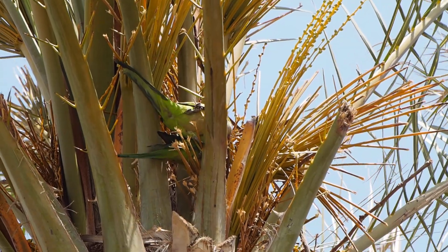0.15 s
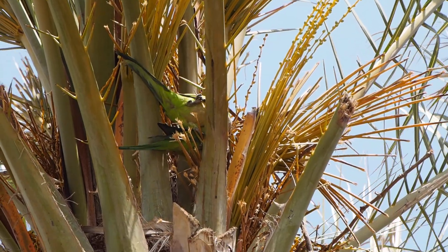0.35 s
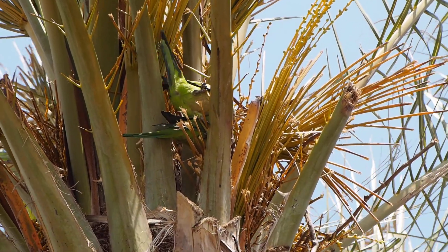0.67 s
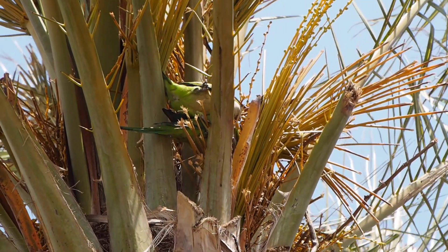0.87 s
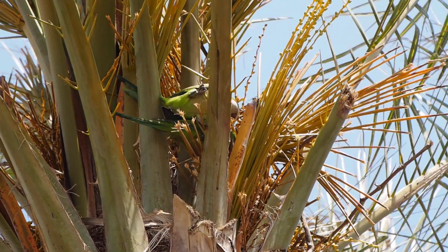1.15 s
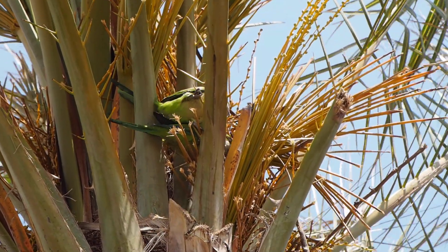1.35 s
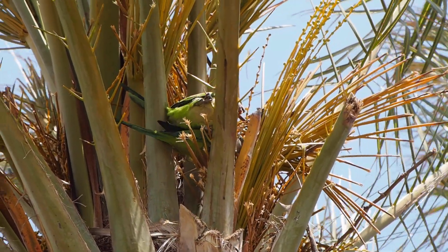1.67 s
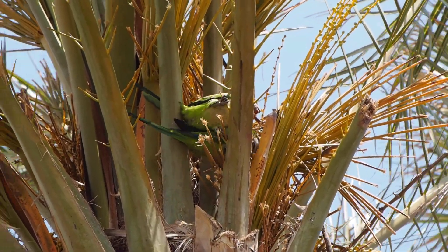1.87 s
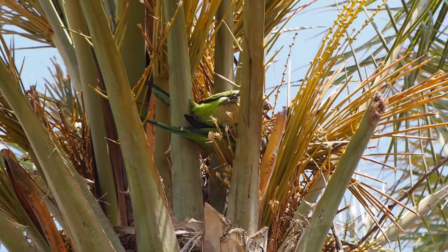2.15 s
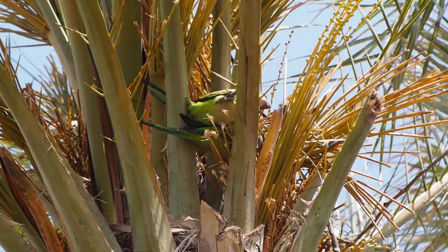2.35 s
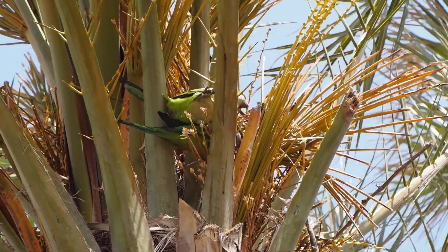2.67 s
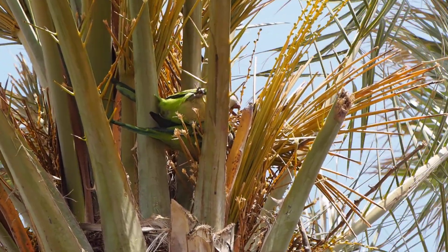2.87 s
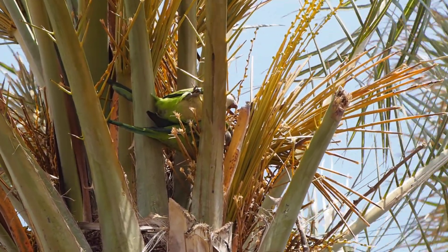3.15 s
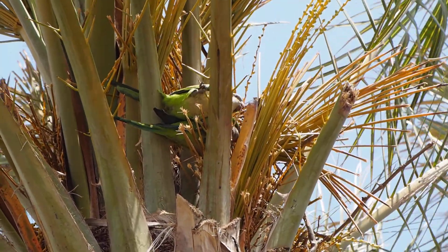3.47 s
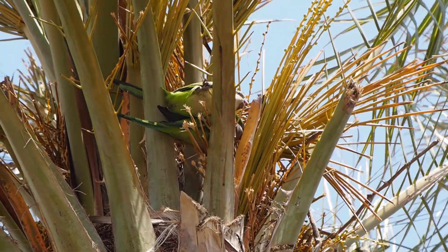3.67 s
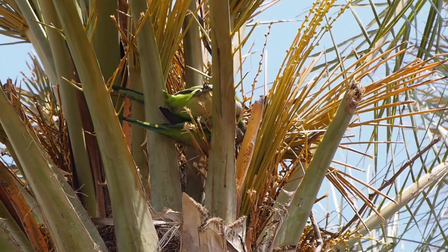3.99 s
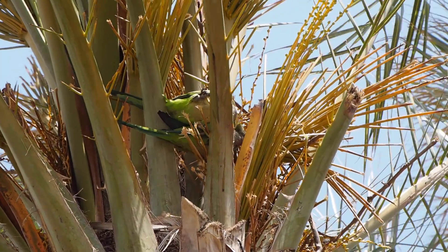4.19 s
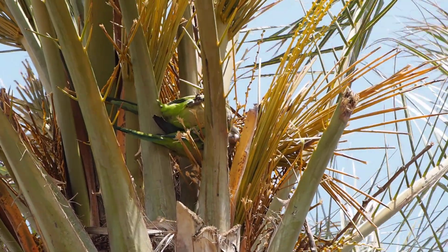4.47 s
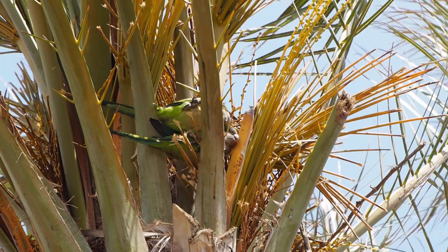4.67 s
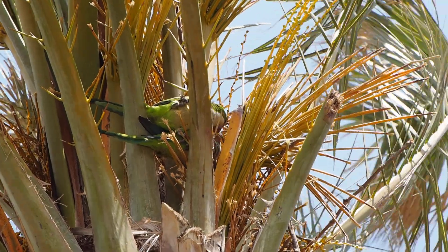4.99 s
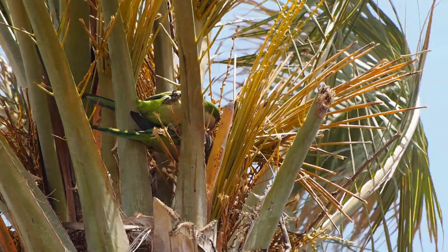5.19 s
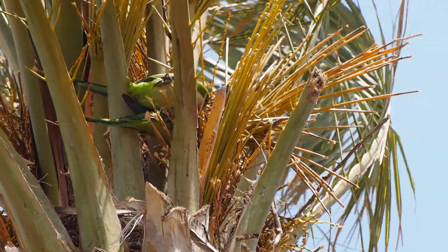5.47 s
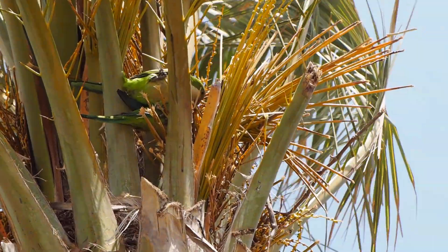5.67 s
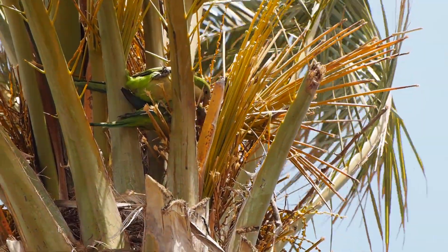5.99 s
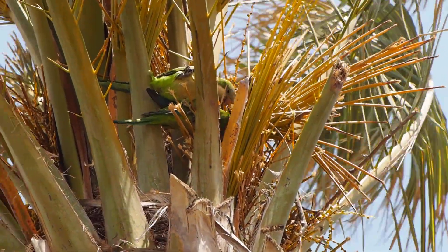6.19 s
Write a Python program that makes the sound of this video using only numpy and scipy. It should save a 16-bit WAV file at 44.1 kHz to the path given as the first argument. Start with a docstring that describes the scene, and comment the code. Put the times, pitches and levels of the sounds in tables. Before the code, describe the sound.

Wind buffets the microphone outdoors from the start, an uneven low rumble with flutter and sharp little pops, mostly on the left. Palm fronds rustle softly and slowly grow a little louder. Nearby parakeets whistle quick, high warbled notes over bouts of raspy chatter from a farther flock. A soft screech comes at about 1.4 seconds. Four loud ones follow at about 2.3, 3.0, 3.4 and 4.0 seconds, each a short, harsh, rapid trill that rises and falls in pitch, with a brief echo from the trees. Near 4 seconds a faint, thin, steady tone enters in the distance. From 4.7 to 5.6 seconds warbles and chatter crowd together in a busy flurry. They then thin to a couple of soft whistles, leaving the wind, the fronds and the tone until the end, a little past 6 seconds.

```python
"""Parakeets in a palm. From the start, gusts shed eddies at each of two microphone ports and fronds
rustle; the birds whistle quick warbled notes over the flock's farther chatter. A soft screech at 1.4 s,
then four loud ones from 2.3 to 4.3 s: trills of harmonic syllables, shaped by throat and beak, echoed
by the trees. A thin far tone enters near 4 s. Warbles and chatter crowd in from 4.7 to 5.6 s, then
thin out, leaving wind, fronds and the tone."""
import sys
import numpy as np
from scipy import signal
from scipy.fft import rfft, irfft, next_fast_len
from scipy.io import wavfile
from scipy.ndimage import uniform_filter1d, map_coordinates

SR = 44100
rng = np.random.default_rng(int(sys.argv[2]) if len(sys.argv) > 2 else 0)


def to_wav(s):
    """Save 16-bit WAV."""
    ch = np.atleast_2d(s).T  # columns
    pcm = np.round(np.clip(ch, -1, 1) * 32767)  # PCM
    wavfile.write(sys.argv[1], SR, pcm.astype(np.int16))


N = 279153
TIME = np.arange(N) / SR

# Trills: first syllable t/s, last syllable t/s, mid-trill delay/s, level/dB, swell first to last/dB,
# first f/Hz, top f/Hz, last f/Hz, place of top/0-1, first and last glide/(pitch fraction per 10 ms),
# tilt/(dB per harmonic)
SCREECHES = [(1.3724, 1.594, -0.0012, -37, -2, 940, 1191, 1107, .7, -0.061, 0.0091, .05),
             (2.325, 2.585, -0.0028, -27, 2.5, 947, 1247, 1036, 0.46, 0.063, -0.14, .05),
             (3.021, 3.306, .002, -25, 2, 883, 1073, 867, 0.42, -0.032, -.13, .05),
             (3.424, 3.6686, -.001, -23.5, 1, 867, 1007, 831, 0.332, 0.021, -0.166, 0.1),
             (4.0108, 4.323, 0.003, -25.5, -2, 856, 1088, 898, 0.26, 0.06, -0.13, .05)]
# Syrinx source: harmonic number, level/dB
SYRINX_DB = [(2, 5), (3, 11), (4, 12.5), (5, 3.5), (6, 11.5), (7, 6.5), (8, 4.5), (9, 7.5), (10, 7)]
# Throat and beak response: f/Hz, gain/dB
THROAT_DB = [(1100, -73), (1600, -3), (2000, -8), (2400, 1), (3000, -2.5), (4200, -3.5), (5500, -8),
             (7000, -12.5), (8500, -14.5), (10000, -15.5), (11500, -30), (13000, -35), (15000, -50)]
# Warbled notes, by strongest partial: t/s, length/s, first f/Hz, middle f/Hz, last f/Hz, level/dB,
# other partials re strongest/dB
WARBLES = [(0.212, 0.021, 3300, 4420, 4500, -44, -18), (0.229, 0.023, 3250, 4040, 3220, -39.5, -11),
           (0.256, 0.034, 3270, 3910, 3230, -44, -21), (0.3, 0.027, 4190, 3380, 3480, -40.5, -10),
           (0.37, 0.024, 2290, 3020, 2500, -46, -17), (0.399, 0.021, 2700, 2410, 2580, -44.5, -13),
           (0.45, 0.026, 3010, 3500, 2800, -44, -10), (0.539, 0.048, 2760, 3210, 2980, -47.5, -5),
           (0.68, 0.039, 3000, 3300, 2860, -48.5, -30), (0.808, 0.041, 3670, 4460, 3300, -40.5, -12),
           (0.854, 0.019, 3630, 3770, 4250, -41, -19), (0.876, 0.015, 4270, 3440, 3660, -40, -10),
           (0.903, 0.015, 3720, 3530, 3280, -39, -30), (0.94, 0.053, 2310, 2010, 2230, -48, -8),
           (1.199, 0.026, 3480, 3430, 3130, -42.5, -7), (1.466, 0.031, 2500, 2370, 2700, -40, -30),
           (1.51, 0.043, 3340, 3120, 2300, -40, -30), (1.728, 0.071, 2340, 2690, 2550, -47, -30),
           (1.82, 0.03, 2990, 2530, 2120, -40, -30), (1.835, 0.035, 3550, 3190, 2450, -38.5, -30),
           (1.878, 0.024, 2860, 2430, 2290, -42.5, -30), (2.0, 0.04, 2200, 2480, 3900, -44, -10),
           (2.044, 0.023, 3970, 2675, 3800, -32, -19), (2.079, 0.013, 3960, 3430, 3360, -35, -11),
           (2.106, 0.016, 3690, 3640, 3560, -30.5, -5), (2.122, 0.027, 3360, 2180, 2360, -35.5, -30),
           (2.158, 0.031, 3070, 3640, 4130, -44, -11), (2.17, 0.041, 4010, 3940, 2400, -49, -12),
           (2.409, 0.021, 3520, 3300, 3250, -34, -12), (3.678, 0.023, 1990, 2380, 2350, -33.5, -7),
           (3.704, 0.02, 4180, 3360, 3440, -33.5, -9), (3.721, 0.039, 3880, 3630, 3770, -39, -10),
           (3.749, 0.05, 3660, 3830, 3770, -36, -12), (4.733, 0.024, 2305, 2375, 2120, -35.5, -7),
           (4.761, 0.013, 1770, 1940, 1940, -38, -18), (4.79, 0.022, 1810, 1790, 1710, -41, -5),
           (4.827, 0.055, 3820, 3920, 3920, -39.5, -30), (4.973, 0.0194, 2030, 2370, 2650, -38, -6),
           (5.024, 0.018, 4800, 4240, 3990, -35, -12), (5.04, 0.016, 3860, 4320, 4400, -32.5, -2),
           (5.058, 0.023, 3920, 3700, 4440, -36, -7), (5.092, 0.032, 2260, 2270, 2520, -43, -30),
           (5.115, 0.036, 3350, 3880, 3730, -31.5, -18), (5.134, 0.011, 3380, 3460, 3600, -30, -11),
           (5.144, 0.024, 3880, 4070, 4550, -27.5, -7), (5.168, 0.014, 4680, 4000, 3620, -29.5, -10),
           (5.193, 0.012, 3420, 3630, 4150, -28.5, -11), (5.212, 0.013, 3410, 4000, 4970, -30, -14),
           (5.227, 0.06, 3710, 3620, 4960, -35, -9), (5.292, 0.012, 4180, 3330, 2600, -37, -20),
           (5.312, 0.022, 3430, 3630, 3370, -36, -30), (5.34, 0.024, 3600, 3500, 3280, -38, -30),
           (5.365, 0.026, 2550, 2630, 2380, -36, -5), (5.376, 0.045, 4080, 4540, 4560, -35, -14),
           (5.379, 0.028, 3340, 3420, 3700, -34, -20), (5.399, 0.028, 4790, 4890, 4740, -36.5, -5),
           (5.493, 0.025, 3390, 3930, 4130, -38.5, -30), (5.512, 0.012, 3190, 3940, 4600, -41, -10),
           (5.527, 0.016, 4640, 4190, 4000, -30.5, -25), (5.545, 0.015, 3940, 4320, 4530, -26.5, -14),
           (5.561, 0.025, 3930, 3560, 4330, -34, -8), (5.803, 0.11, 2060, 2030, 2050, -42.5, -30),
           (6.201, 0.091, 2550, 2545, 2560, -47.5, -30)]
# Flock bouts: t/s, length/s, level below 5 kHz/dB, level above 5 kHz/dB
BOUTS = [(0, 0.014, -42.5, -55), (0.176, .12, -49, -58), (0.366, 0.09, -49.5, -55.5),
         (0.546, 0.056, -43.5, -66), (0.791, 0.14, -46.5, -53), (0.931, 0.068, -39.5, -49.5),
         (1.178, 0.047, -46, -72), (1.402, .2, -41, -50.5), (1.788, .09, -49, -56.5),
         (1.995, 0.12, -37, -47), (2.123, 0.11, -37.5, -48.5), (2.584, 0.39, -52, -56.5),
         (3.67, 0.07, -44, -46), (4.353, 0.031, -45.5, -70), (4.576, 0.091, -43.5, -57),
         (4.7, 0.19, -42, -49.5), (4.983, 0.12, -40, -45.5), (5.105, 0.28, -37.5, -40.5),
         (5.421, 0.17, -39.5, -46.5)]
# Tree echo decay: f/Hz, T60/s
ECHO_T60_S = [(1500, .22), (4000, .15), (10000, .12)]
# Wind at the ports: t/s, flutter level/dB, buffet re flutter/dB, flutter left-right/dB
GUSTS = [(0.0, -25, 1, -24.5), (0.07, -21, 4.5, -18), (0.25, -23, 1, -23), (0.37, -28, 2, -5),
         (0.54, -31, 6, -9), (0.63, -16, -2, -29), (0.7, -29.5, 4.5, -23.0), (0.79, -21.5, -1, -17),
         (0.88, -27.5, 3, -13.5), (0.95, -37.5, 8, 3), (1.09, -24.5, 2, -18.5), (1.2, -24, 0, -14.0),
         (1.43, -48.5, 12.5, -1), (1.6, -25, 2.5, -24.5), (1.74, -26.5, 9, -30), (1.85, -35.5, 8, -19.5),
         (2.33, -25, 5.5, -13.5), (2.36, -38, 10, -6.5), (2.57, -28, 6, -13), (2.82, -36.5, 9, -7),
         (3.12, -24.5, 3.5, -18), (3.15, -40.5, 12, -13.0), (3.21, -20, 3.5, -17.5), (3.35, -32, 9, -3.5),
         (3.49, -22, 4.5, -11), (3.58, -28, 0, -7), (3.6, -33, 13.5, -1), (3.75, -22, 3.5, 13),
         (4.09, -41.5, 11.5, -6), (4.14, -50, 16, 10), (4.25, -39, 12, -11), (4.39, -44.5, 10.5, 0),
         (4.57, -31.5, 8.5, -16.0), (4.78, -31, 8, -22), (5.06, -45, 13.5, -6), (5.2, -27, 6.5, -25),
         (5.43, -34.5, 8, -18.0), (5.52, -25.5, 6, -25), (5.61, -44, 15, -2.5), (5.68, -27, 7.5, -32),
         (5.71, -40.5, 11, -16), (5.87, -31.5, 9, -21), (6.28, -29.5, 7, -22), (6.33, -33.5, 14, -5)]
# Sharp eddies: t/s, peak/dB, left-right/dB
POPS = [(0.023, -13.5, -24), (0.078, -8, -26), (0.142, -7, -29), (0.189, -13, -24), (0.629, -2, -32),
        (0.645, -8.5, -27), (0.783, -14.5, -22), (0.811, -14, -26), (1.044, -19.5, -20), (1.147, -30, -12),
        (1.178, -15, -18.0), (1.339, -24, -21), (1.651, -15.5, -25), (1.76, -16.5, -21), (1.818, -20, -20),
        (2.13, -12.5, -20), (2.174, -9, -28), (2.464, -13.5, -28), (2.508, -16, -15.0),
        (3.074, -12.5, -21.5), (3.118, -29, -21.5), (3.196, -18.5, -18), (3.458, -11, -20),
        (3.476, -8.5, -31), (3.702, -16.5, 17), (3.747, -9.5, 22.5), (3.839, -9, 3), (3.86, -10, 19),
        (3.949, -33, 7), (4.686, -18.5, -25), (5.199, -14.5, -29)]
# Wind spectra (low buffet, brighter flutter, eddy crackle): f/Hz, relative density/dB
BUFFET_DB = [(12, -55), (20, -32), (80, -6.5), (112, -6.5), (145, -5.5), (195, -8.5), (280, -18),
             (500, -30), (650, -72), (1100, -120)]
FLUTTER_DB = [(120, -35), (250, 4), (400, 1), (700, -8), (1050, -14.5), (1300, -26), (2500, -33.5),
              (6000, -80)]
CRACKLE_DB = [(150, -49), (350, 4), (600, 9.5), (1000, -2.5), (1350, -18), (2500, -24), (5000, -72),
              (9000, -73)]
# Rustle spectrum: f/Hz, relative density/dB
FROND_SPECTRUM_DB = [(350, -44), (600, -5), (809, -10), (1050, -6), (1180, -10.5), (1300, -15),
                     (1550, -7.5), (2680, -8), (5000, -19.5), (7730, -23.5), (8740, -18), (15500, -41)]
# Background rustle level as the recorder's gain rises, quieter during the early loud wind: t/s, level/dB
BACKGROUND_GAIN_DB = [(0.0, -52.5), (0.7, -48.5), (5.46, -40.5), (5.57, -41.5), (6.33, -40.5)]
# Rustle shared by the ports: f/Hz, left-right correlation
FROND_CORRELATION = [(800, 0.48), (2500, 0.39), (5000, 0.058), (10000, 0.038)]
# Far tone envelope: t/s, level/dB
TONE_LEVEL_DB = [(3.9, -82), (4.1, -57), (5.4, -60), (5.6, -51), (6.33, -48)]


def syllables(spacing_s=.026, onset_db=12, fade_db=5, dulling_db=.2):
    """Syllable trains: pitch arches up and down, ends are soft. Yields t/s, level/dB, f/Hz, glide, tilt."""
    for first_s, last_s, delay_s, db, swell_db, *arch, first_glide, last_glide, tilt_db in SCREECHES:
        first_hz, top_hz, last_hz, top = arch
        k = np.arange(round((last_s - first_s) / spacing_s) + 1)
        progress, scatter = k / k[-1], rng.standard_normal((3, len(k)))
        rise = np.clip(1 - progress / top, 0, 1) ** 2.19
        fall = np.clip((progress - top) / (1 - top), 0, 1) ** 1.67
        pitch_hz = top_hz + (first_hz - top_hz) * rise + (last_hz - top_hz) * fall
        soft_db = onset_db * np.exp(-k) + fade_db * np.exp(-k[::-1] / .85)
        centre_s = first_s + (last_s - first_s) * progress + delay_s * np.sin(np.pi * progress)
        yield from zip(centre_s + .001 * scatter[2],
                       db + swell_db * (progress - .5) - soft_db + scatter[0],
                       pitch_hz * (1 + .012 * scatter[1]),
                       first_glide + (last_glide - first_glide) * progress,
                       tilt_db - dulling_db * progress)


def screeches(upper_half_s=.0073, low_half_s=.013, edge_s=.00059, bend=.152, hook=.0992, rasp_db=-11):
    """Each syllable: syrinx harmonics and breath rasp in one throat; pitch dips midway, ends hook up."""
    out = np.zeros(N)
    breath = unit(np.gradient(noise(THROAT_DB, channels=1)[0]))  # turbulence leans to the treble
    t = np.arange(-600, 600) / SR
    t_10ms, harmonic = 100 * t, np.arange(1, 16)[:, None]
    # Upper harmonics sound only while the membranes close fully; the lowest two last longer.
    half_s = np.where(harmonic > 2, upper_half_s, low_half_s)
    gate = 1 / (1 + np.exp((np.abs(t) - half_s) / edge_s))
    source_db = np.interp(harmonic, *np.transpose(SYRINX_DB))
    for centre_s, db, hz, glide, tilt_db in syllables():
        rough, scatter = rng.standard_normal((2, len(t)))
        jitter = .013 * unit(uniform_filter1d(rough, size=45))
        dip = bend * t_10ms ** 2 + hook * np.minimum(t_10ms ** 4, 3)
        pitch_hz = hz * (1 + dip + glide * t_10ms + jitter)
        bright_db = (.12 * (db + 30) + tilt_db) * harmonic  # louder is brighter
        throat_db = at_hz(THROAT_DB, harmonic * pitch_hz)
        gains = amp(source_db + throat_db + bright_db + 2 * scatter[:len(harmonic), None])
        phase = harmonic * phase_rad(pitch_hz) + 2 * np.pi * scatter[-len(harmonic):, None]
        stack = np.sum(gate * gains * np.sin(phase), 0)
        power = np.sum(gains ** 2 / 2, 0)
        stack /= np.sqrt(np.mean(power[np.abs(t) < upper_half_s]))
        rasp = amp(rasp_db) * gate[0] * breath[round(centre_s * SR):][:len(t)]
        add(out, centre_s + t[0], amp(db) * (stack + rasp))
    return out


def warbles(edge_s=.0019):
    """Unsteady gliding whistles: low notes lead with the fundamental, high ones with harmonic 2."""
    out = np.zeros(N)
    quaver = .009 * wobble(400)[0]
    tremor_db = 1.5 * wobble(150)[0] + 2.5 * wobble(600)[0]
    for start_s, length_s, *glide_hz, db, others_db in WARBLES:
        t = np.arange(-edge_s, length_s + edge_s, 1 / SR)
        pitch_hz = np.polyval(np.polyfit([0, .5, 1], glide_hz, deg=2), t / length_s)
        pitch_hz *= 1 + quaver[round(start_s * SR):][:len(t)]
        lead, neighbour, top = (1, 2, 4) if np.mean(glide_hz) < 2700 else (2, 1, 5)
        phase = phase_rad(pitch_hz) / lead
        others = np.sin(neighbour * phase) + amp(-5) * np.sin(3 * phase) + amp(-14) * np.sin(top * phase)
        voice = np.sin(lead * phase) + amp(others_db) * others
        fade = np.clip(np.minimum(t + edge_s, length_s + edge_s - t) / (2 * edge_s), 0, 1)
        add(out, start_s - edge_s, np.sqrt(2) * amp(db) * fade * voice)
    return out * amp(tremor_db)


def bout_gains(murmur_db=-59.5, swell_s=.02, die_s=.068):
    """Flock gain, low and high band: bouts swell, hold and die over a steady low-band murmur."""
    gains = np.array([np.full(N, amp(murmur_db)), np.zeros(N)])
    for start_s, length_s, *levels_db in BOUTS:
        corners_s = start_s + np.array([-swell_s, swell_s, length_s, length_s + die_s])
        gains += amp(levels_db)[:, None] * np.interp(TIME, corners_s, [0, 1, 1, 0]) ** 2
    return gains


def chatter(birds=6, centre_hz=1400, hoarse_db=-3, split_hz=5000):
    """Farther birds: wandering pitch, chopped into raspy syllables, blurred by breath noise."""
    pitch_hz = centre_hz * np.exp(.12 * wobble(90, birds) + .22 * wobble(5, birds))
    phase = phase_rad(pitch_hz)
    voices = sum(amp(at_hz(THROAT_DB, k * pitch_hz)) * np.sin(k * phase) for k in range(1, 9))
    chop_db = 7 * wobble(55, birds) + 3 * wobble(500, birds)
    flock = unit(voices * amp(chop_db)).reshape(2, -1, N).sum(1)  # half the birds per side
    flock = unit(flock) + amp(hoarse_db + 2.5 * wobble(40)) * noise(THROAT_DB)
    flock = flock + .22 * flock[::-1]  # crossfeed
    low = filtered(flock, lambda hz: 1 / (1 + (hz / split_hz) ** 8))
    low_gain, high_gain = bout_gains()
    return low_gain * unit(low) + high_gain * unit(flock - low)


def tree_echoes(x, delay_samples=150):
    """Scatter from trunks and fronds; treble dies first."""
    hz, t, spectra = signal.stft(rng.standard_normal((2, SR // 3)), SR, nperseg=256)
    decay = amp(-60 * t / at_hz(ECHO_T60_S, hz)[:, None])
    tail = signal.istft(spectra * decay, SR, nperseg=256)[1]
    delayed = np.pad(x, (delay_samples, 0))[None]
    return signal.fftconvolve(delayed, tail / np.linalg.norm(tail[0]), axes=1)[:, :N]


def wind(gusting_db=1.2, spike_db=-14, buffet_pan_share=.59):
    """Eddies shed at each port: low buffet, bursts of brighter flutter, spikes on the strongest swings."""
    flutter_db, buffet_db, pan_db = curves(GUSTS)
    swell_db = gusting_db * wobble(8, channels=2)
    eddies, ripples = wobble(45, channels=2), wobble(170, channels=2)
    buffet = unit(amp(1.92 * eddies + swell_db) * noise(BUFFET_DB))
    flutter = unit(amp(2.6 * eddies + 3.8 * ripples) * noise(FLUTTER_DB))
    spikes = unit(amp(4 * eddies + 6 * ripples) * noise(CRACKLE_DB))
    return (port_gains(flutter_db + buffet_db, buffet_pan_share * pan_db) * buffet
            + port_gains(flutter_db, pan_db) * (flutter + amp(spike_db) * spikes))


def eddy_pops(attack_s=.0012, decay_s=.006):
    """Sharp eddies: sudden crackling bursts, mostly on one port."""
    out, crackle, t = np.zeros((2, N)), noise(CRACKLE_DB), np.arange(SR // 30) / SR
    envelope = np.exp(-t / decay_s) * np.sin(np.pi / 2 * np.minimum(t / attack_s, 1)) ** 2
    for start_s, peak_db, pan_db in POPS:
        sides = amp([pan_db / 2, -pan_db / 2])
        for port, gain, air in zip(out, sides / np.mean(sides), crackle):
            burst = envelope * air[round(start_s * SR):][:len(t)]
            add(port, start_s, gain * amp(peak_db) * burst / np.max(np.abs(burst)))
    return out


def fronds(stir_db=.8):
    """Distant leaf rustle, partly shared by both ports; it comes up with the recorder's gain."""
    def mid_side_gains(hz):
        angle_rad = np.arccos(at_hz(FROND_CORRELATION, hz)) / 2
        return np.array([np.cos(angle_rad), np.sin(angle_rad)])
    mid, side = filtered(noise(FROND_SPECTRUM_DB), mid_side_gains)
    rustle = unit(np.array([mid + side, mid - side]))
    return amp(curves(BACKGROUND_GAIN_DB)[0] + stir_db * wobble(5)) * rustle


def far_tone(centre_hz=1030):
    """Thin distant sine, wavering slightly in pitch and level."""
    pitch_hz = centre_hz * (1 + .0034 * wobble(20)[0])
    level_db = curves(TONE_LEVEL_DB)[0] + 1.4 * wobble(16)[0]
    return np.sqrt(2) * amp(level_db) * np.sin(phase_rad(pitch_hz))


def amp(db):
    """dB to gain."""
    return 10 ** (np.asarray(db) / 20)


def unit(x):
    """Each channel to rms 1."""
    return x / np.sqrt(np.mean(x ** 2, -1, keepdims=True) + 1e-20)


def phase_rad(hz):
    """Running phase of a pitch curve."""
    return 2 * np.pi * np.cumsum(hz, -1) / SR


def at_hz(points, hz):
    """Interpolate (f/Hz, value) rows on a log axis."""
    knots_hz, values = np.transpose(points)
    return np.interp(np.log(np.abs(hz) + 1), np.log(knots_hz + 1), values)


def curves(rows):
    """Per-sample curve for each column after t/s."""
    knots_s, *columns = np.transpose(rows)
    return [np.interp(TIME, knots_s, column) for column in columns]


def wobble(knots_per_s, channels=1):
    """Smooth random curves."""
    knots = rng.standard_normal((channels, int(N * knots_per_s / SR) + 4))
    return np.array([map_coordinates(row, [TIME * knots_per_s]) for row in knots])


def filtered(x, response):
    """Apply the gain response(hz) by FFT."""
    size = next_fast_len(N + 8192)
    return irfft(rfft(x, size) * response(np.fft.rfftfreq(size, 1 / SR)), size)[..., :N]


def noise(spectrum_db, channels=2):
    """Coloured noise, rms 1."""
    return unit(filtered(rng.standard_normal((channels, N)), lambda hz: amp(at_hz(spectrum_db, hz))))


def port_gains(db, pan_db):
    """Gains for two uncorrelated ports whose mean signal has level db."""
    sides = amp([pan_db / 2, -pan_db / 2])
    return 2 * amp(db) * sides / np.sqrt(np.sum(sides ** 2, 0))


def add(track, start_s, sound):
    """Mix a short sound in."""
    i = max(round(start_s * SR), 0)
    track[i:i + len(sound)] += sound[:len(track) - i]


def scene(echo_db=-7.5):
    """Near birds, the camera body shading the left port; then flock, echoes, wind, leaves and tone."""
    birds = screeches() + warbles()
    shaded = filtered(np.roll(birds, 1), lambda hz: amp(-2.5 - 3.4 * (hz / 9000) ** 2))
    near = np.array([shaded, birds]) + amp(echo_db) * tree_echoes(birds)
    return near + chatter() + wind() + eddy_pops() + fronds() + far_tone()


def record(dry, ceiling=.88, top_hz=15750):
    """Soft peak rounding, then the camera's band limit."""
    rounded = dry / (1 + np.abs(dry / ceiling) ** 4) ** (1 / 4)
    return filtered(rounded, lambda hz: hz < top_hz)


dry = scene()
out = record(dry)
to_wav(out)
```